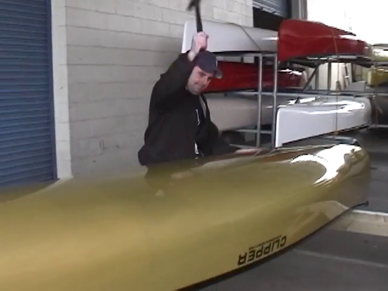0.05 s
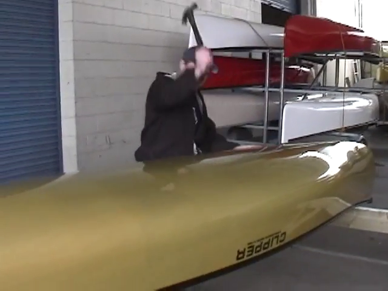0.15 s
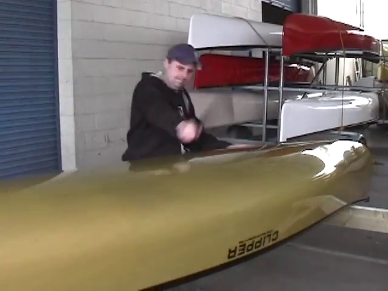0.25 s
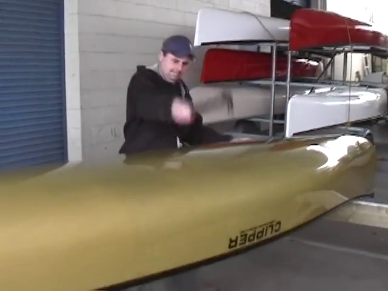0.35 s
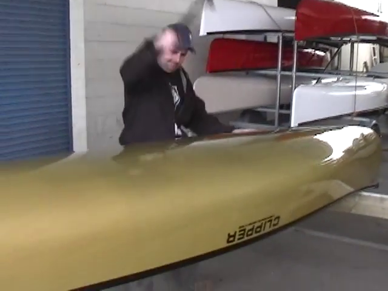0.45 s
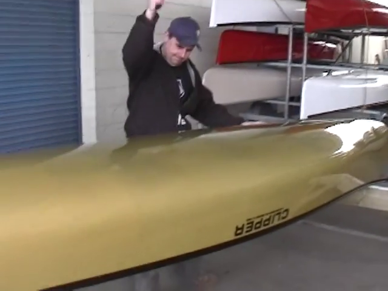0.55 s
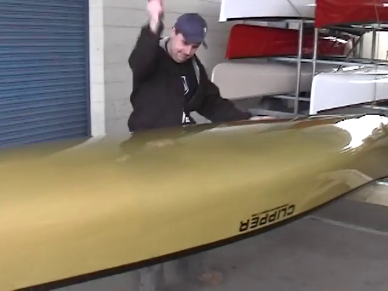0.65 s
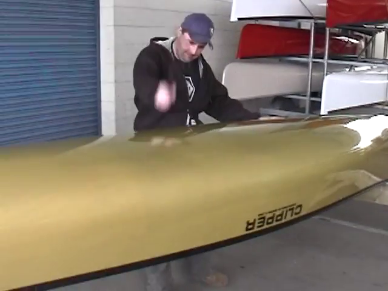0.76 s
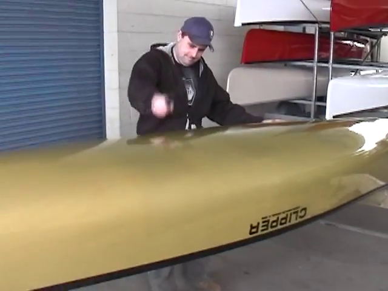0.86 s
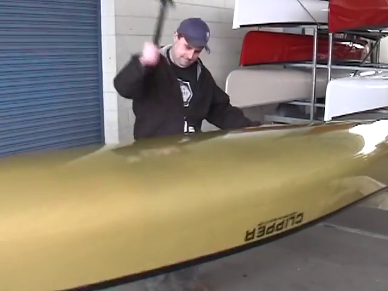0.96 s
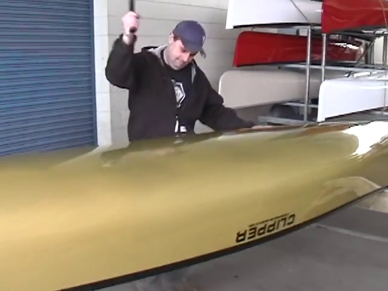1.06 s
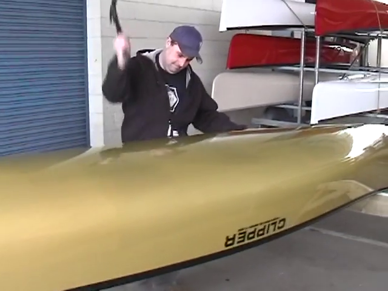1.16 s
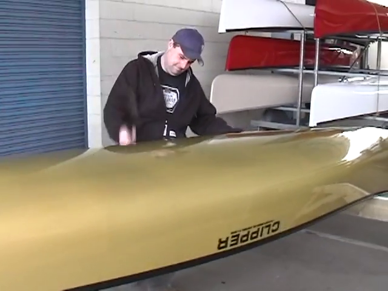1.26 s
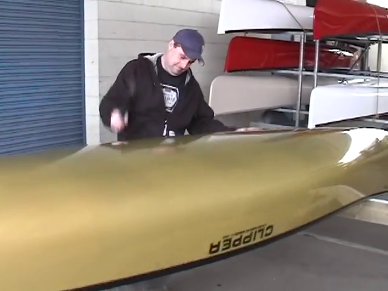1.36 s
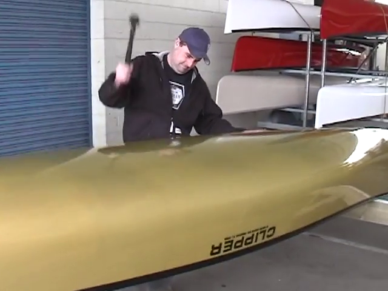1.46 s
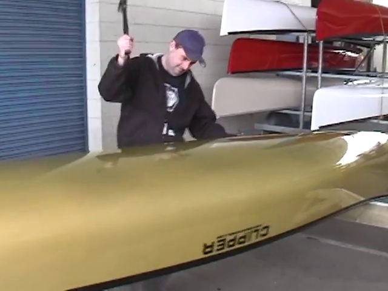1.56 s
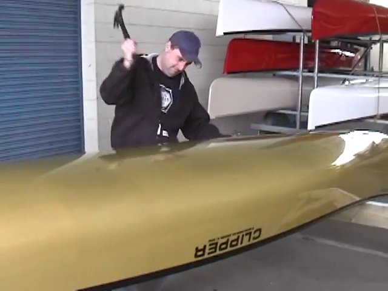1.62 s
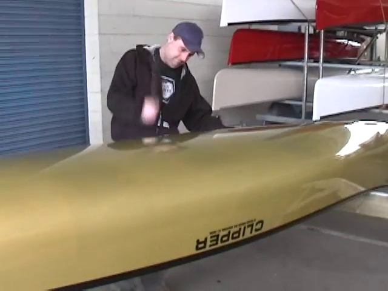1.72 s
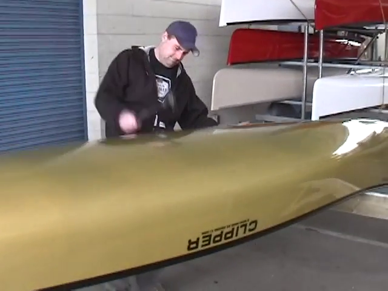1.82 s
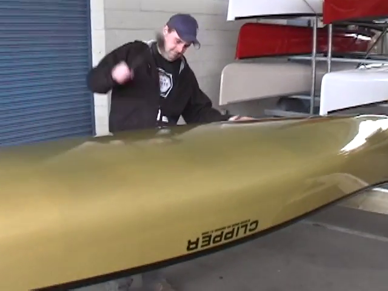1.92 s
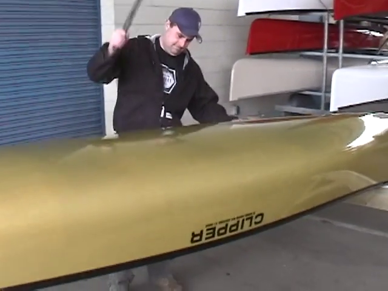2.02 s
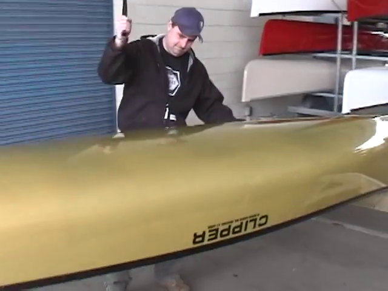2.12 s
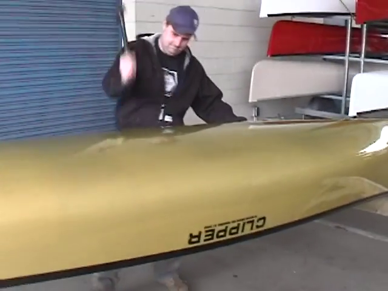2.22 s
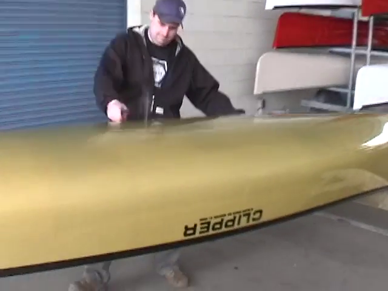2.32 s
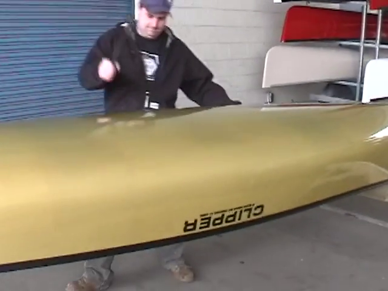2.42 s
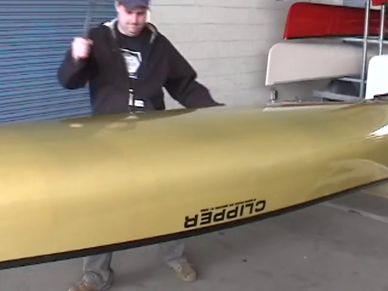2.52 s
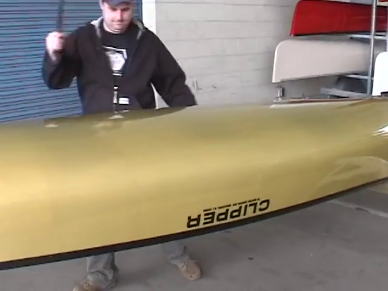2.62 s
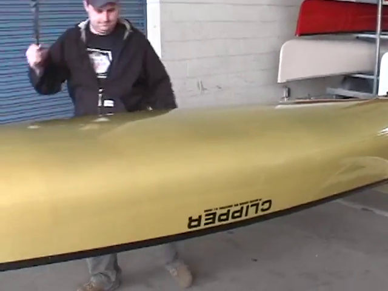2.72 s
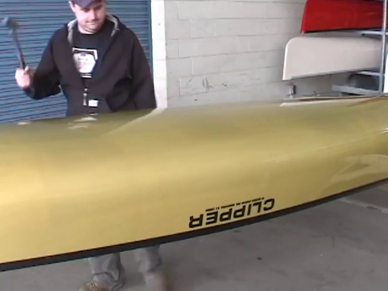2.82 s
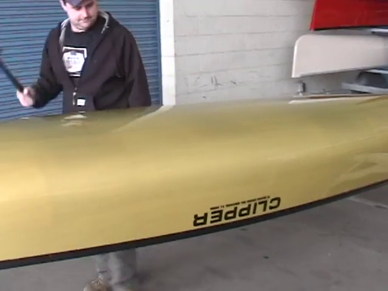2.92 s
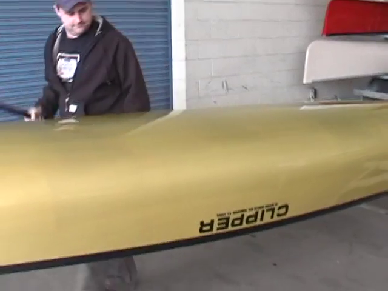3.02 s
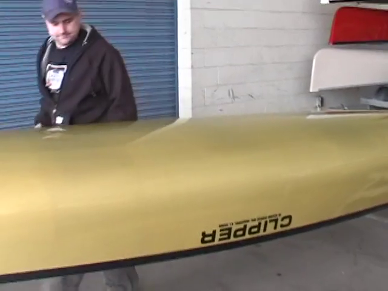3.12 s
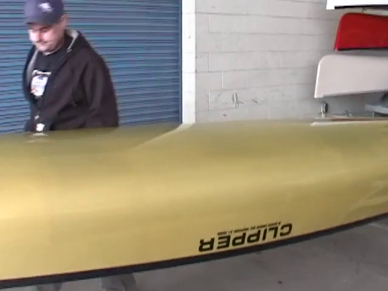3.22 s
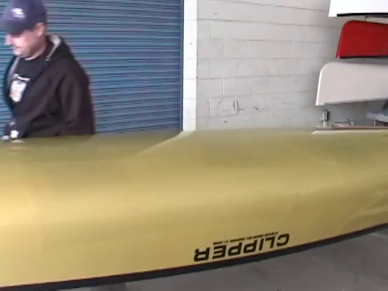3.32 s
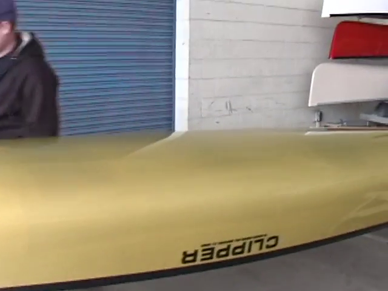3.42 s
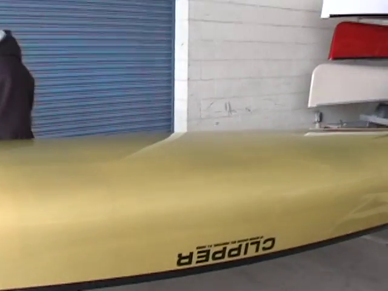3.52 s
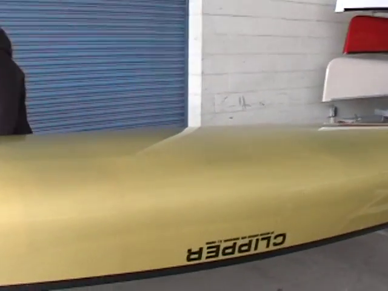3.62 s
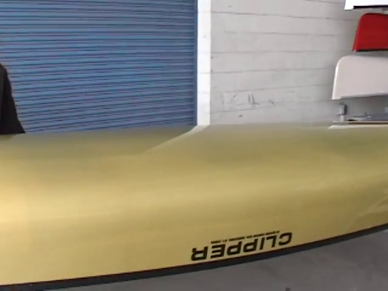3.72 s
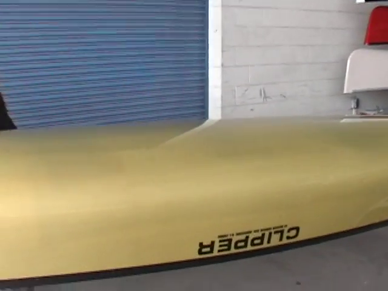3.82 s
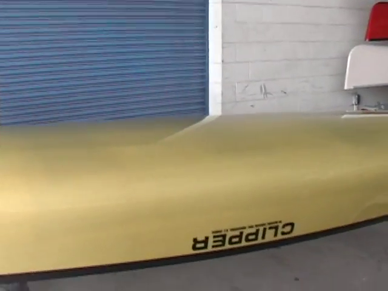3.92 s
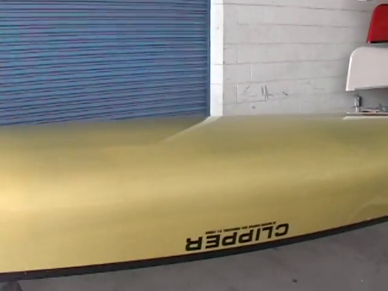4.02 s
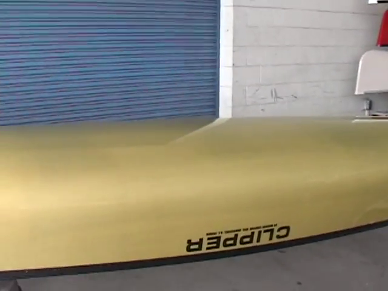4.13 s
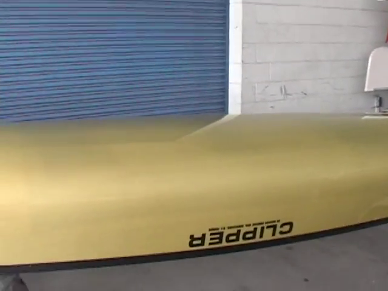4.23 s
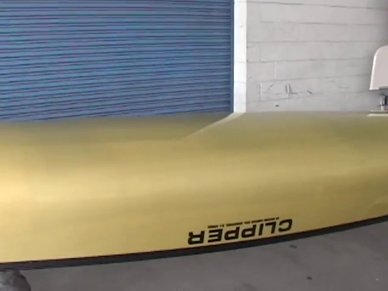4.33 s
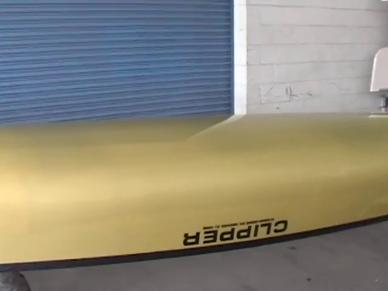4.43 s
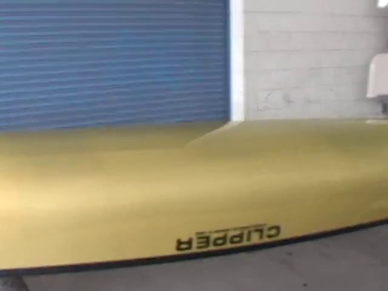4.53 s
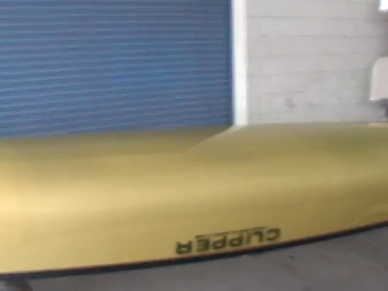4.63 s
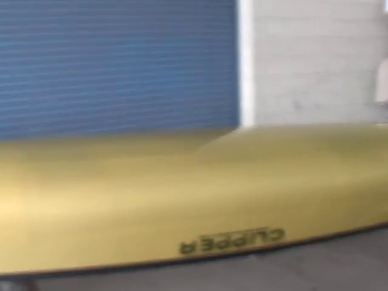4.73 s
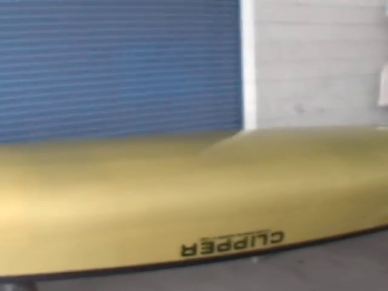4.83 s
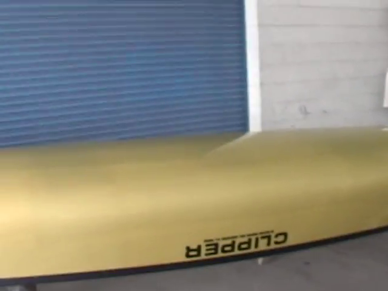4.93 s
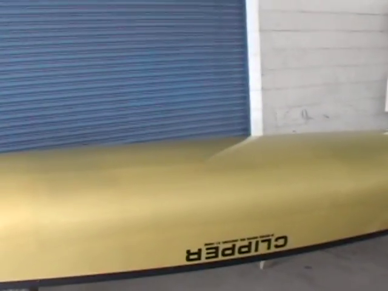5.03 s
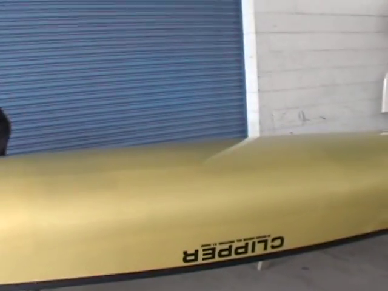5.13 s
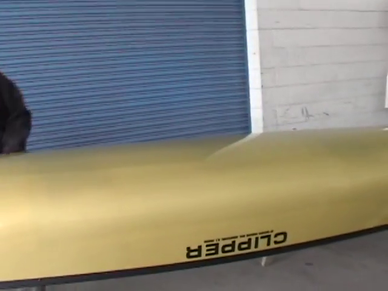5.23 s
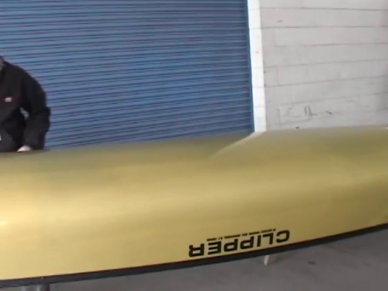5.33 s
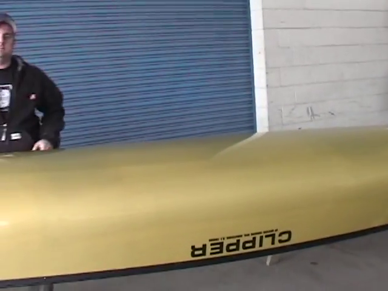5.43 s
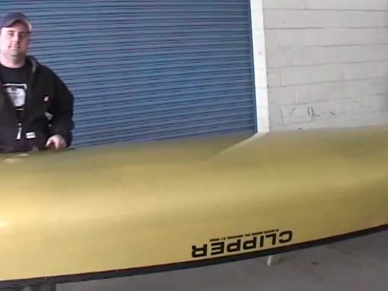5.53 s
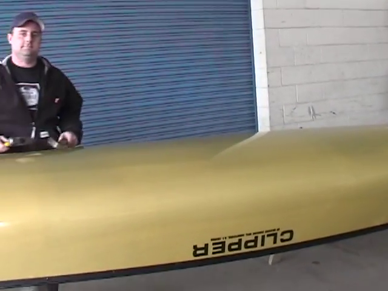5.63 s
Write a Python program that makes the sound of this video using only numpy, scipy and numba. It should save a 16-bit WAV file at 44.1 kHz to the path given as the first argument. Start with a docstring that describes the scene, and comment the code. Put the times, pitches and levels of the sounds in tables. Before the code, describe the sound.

In an echoing concrete boat shed, heavy hammer blows land evenly on a hard canoe hull, each a sharp crack with a hollow boom, a brief rattle and a softer rebound knock. The nearby microphone sounds squashed by the hits. After five blows the hammering stops and steady fan noise gradually rises, joined late by small handling clicks and a low machine drone.

```python
"""Hammering a canoe hull

A man hammers an upturned composite hull in a concrete boat shed, about two blows a second. Each blow
cracks, rings the shell, rattles fittings and fills the hall; the hull then jolts back on its stands.
The camcorder's gain control ducks for the blows, then slowly lifts the ventilation hum.
A few light clicks follow and a machine drone swells in."""
import sys
import numpy as np
from scipy import signal
from scipy.fft import rfft, irfft, next_fast_len
from scipy.io import wavfile
from scipy.ndimage import uniform_filter1d
from numba import njit

SR = 44100
rng = np.random.default_rng(int(sys.argv[2]) if len(sys.argv) > 2 else 0)


def unload_audio(sound):
    """Save the sound as a 16-bit wav file, at the path given as the first command line argument."""
    columns = np.transpose(np.atleast_2d(sound))
    # keep every value between -1 and 1, then stretch to whole-number steps
    steps = np.round(np.clip(columns, -1, 1) * 32767)
    wavfile.write(sys.argv[1], SR, steps.astype(np.int16))


N = 249593


# blows: t/s, level/dB, wait to jolt/s, jolt level/dB
BLOWS = [(-0.165, 6.5, 0.326, -13.5), (0.3304, 2.5, 0.23, -9), (0.8380, 4, 0.214, -5),
         (1.3203, 7, 0.25, -5.5), (1.8127, 6, 0.253, -0.5), (2.3485, 11, 0.28, -10)]
# dense shell resonances: f/Hz, density/dB
SHELL_SPECTRUM = [(30, -20), (60, -17.5), (100, -3), (200, -2), (380, 0.5), (600, -5.5), (1050, -8),
                  (2000, -14), (3600, -19.5), (5500, -16), (9000, -13), (12000, -15), (15500, -30.5)]
# snap of a hard contact on the skin: f/Hz, density/dB
SNAP_SPECTRUM = [(300, -17.5), (2500, -12), (4500, 0), (6500, 0), (9500, 2), (12000, -0.5), (16000, -17.5)]

def hammering(ripple_db=1.5, usual_blow_db=5, size=65536):
    """Each blow snaps on the skin and shakes the hull, which then jolts back on its stands."""
    out = np.zeros((2, N))
    hz = np.arange(30, 16000, 30)
    peaks_db = ripple_db * treble(hz) * rng.standard_normal(len(hz))  # stiff shell: narrow resonances
    shell = np.c_[hz, read(SHELL_SPECTRUM, hz) + peaks_db]
    for at_s, db, wait_s, jolt_db in BLOWS:
        extra_db = db - usual_blow_db  # the hull flexes only so far: extra force goes to the midrange
        crack = strike(shell, size, t60_s=0.51, hall_db=2.5,
                       bright_db=-0.5 * extra_db, boom_db=-1.16 * extra_db)
        ring = undb(-11) * hull_ring(size)
        snap = undb(-5.5) * burst(SNAP_SPECTRUM, t60_s=0.009, bright_db=5, size=4096)
        add(out, undb(db) * snap, at_s)
        add(out, undb(db) * (crack + ring + rattle(size)), at_s)
        knock = strike(shell, size, t60_s=0.23, hall_db=-12.5, bright_db=-1.5, boom_db=2.5)
        jolt = knock + undb(-15.5) * hull_ring(size)
        add(out, undb(jolt_db) * jolt, at_s + wait_s)
    return out


# sound straight from the hull: f/Hz, level/dB
DIRECT_SOUND = [(40, 4), (100, -3.5), (400, -15.5), (1200, -12), (3000, -6), (7000, -4), (15000, -8.5)]
# shed reverberation: f/Hz, t60/s
HALL_DECAY = [(40, 0.8), (100, 1.06), (400, 1.275), (1100, 1.43), (2900, 1.157), (5500, 0.72), (9000, 0.66),
              (15000, 0.48)]

def strike(colour, size, t60_s, hall_db, bright_db, boom_db):
    """Dense shell resonances ring out; the hall fills as they empty, then dies away, treble first."""
    hz, spectrum = noise_spectrum(colour, size)
    t, out = np.arange(size) / SR, 0
    centres_hz = np.geomspace(30, 16000, 15)
    for band_hz, weights in zip(centres_hz, np.eye(len(centres_hz))):
        band = irfft(spectrum * read(np.c_[centres_hz, weights], hz), size)
        ring = fade(t, t60_s) ** 2
        hall = (1 - ring) * fade(t, read(HALL_DECAY, band_hz)) ** 2
        power = undb(read(DIRECT_SOUND, band_hz)) ** 2 * ring + undb(hall_db) ** 2 * hall
        tilt_db = bright_db * treble(band_hz) + boom_db / (1 + (band_hz / 350) ** 2)
        out += band * np.sqrt(power) * undb(tilt_db)
    return out


# modes of the hull and the air under it: f/Hz, level/dB, t60/s
HULL_MODES = [(81.7, -8.5, 1.75), (112.7, -6.5, 1.67), (128, -4, 1.22), (162, -0.5, 1.28),
              (178.8, 1.5, 1.17), (190.1, -2, 0.85), (221, -5.5, 0.84), (273.3, 1.5, 0.79),
              (318.4, -2.5, 1.5), (351.6, -4.5, 1.5), (379.7, 1, 1.23), (421.5, 0.5, 1.06),
              (468, -10, 0.52), (504, -3, 1.39), (673, -7.5, 1.34), (806, -1.5, 0.78), (976, -7, 0.88),
              (1145, -3.5, 0.79)]

def hull_ring(size, swell_s=0.049, scatter_db=2, detune=0.00788):
    """Low modes; each blow lands on a new spot and weights them anew."""
    t, out = np.arange(size) / SR, 0
    for hz, db, t60_s in HULL_MODES:
        weight, pitch, phase = rng.standard_normal(3)
        wave = np.sin(2 * np.pi * (hz * (1 + detune * pitch) * t + phase))
        out += undb(db + scatter_db * weight) * fade(t, t60_s) * wave
    return out * (1 - np.exp(-t / swell_s))


def rattle(size, count=14, settle_t60_s=0.58):
    """Loose fittings tick at random while the shaken hull settles."""
    out = np.zeros((2, size))
    for when, force in rng.random((count, 2)):
        at_s = 0.08 + 0.3 * when
        tick = burst(SNAP_SPECTRUM, t60_s=0.02, bright_db=3, size=2048)
        add(out, undb(0.75 + 7 * force) * fade(at_s, settle_t60_s) * tick, at_s)
    return out


# handling clicks: t/s, level/dB, treble/dB
CLICKS = [(4.6608, -37, 11.5), (4.7642, -24, -2)]
# rebound spacing per click: gap/s
REBOUND_GAPS_S = [0.018, 0.0502]

def handling(rebounds=2):
    """Something handled clicks, then rebounds at even gaps, softer and duller."""
    out = np.zeros((2, N))
    for (at_s, db, bright_db), gap_s in zip(CLICKS, REBOUND_GAPS_S):
        add(out, undb(db) * click(bright_db), at_s)
        for k in range(1, rebounds + 1):
            add(out, undb(db - 4) * click(bright_db - 3), at_s + k * gap_s)
    return out


# click colour: f/Hz, density/dB
CLICK_SPECTRUM = [(300, -21.5), (2000, 3), (4000, -5.5), (6000, -9), (8000, -7.5), (11000, -11.5),
                  (12500, -28), (15000, -42)]

def click(bright_db):
    """A small hard contact with a faint wash of the hall."""
    tick = burst(CLICK_SPECTRUM, t60_s=0.015, bright_db=bright_db, size=16384)
    wash = burst(CLICK_SPECTRUM, t60_s=0.45, bright_db=bright_db, size=16384)
    return tick + undb(-19) * wash


# drone harmonics 1, 3, 5: level/dB
DRONE_LEVELS_DB = [-38, -38.5, -39.5]

def drone(pitch_hz=85, mid_swell_s=4.96, rise_s=0.3):
    """A machine's hollow drone of odd harmonics swells in and stays."""
    t = np.arange(N) / SR
    swell = (1 + np.tanh(2 * (t - mid_swell_s) / rise_s)) / 2
    harmonics = [((2 * k + 1) * pitch_hz, db) for k, db in enumerate(DRONE_LEVELS_DB)]
    return swell * tones(harmonics, waver_db=2, drift_hz=0.703)


# rushing air: f/Hz, density/dB
AIR_SPECTRUM = [(25, -24), (50, -6), (90, -1), (200, -3), (420, -2.5), (700, -2), (1150, -2.5),
                (2000, -11.5), (3000, -19.5), (4000, -26), (7000, -34), (11000, -42.5), (14000, -51.5),
                (16000, -49.5)]
# fan harmonics: multiple of shaft rate
FAN_ORDERS = [3, 5, 7, 8, 9, 10, 11, 14, 15, 16, 17, 19]
# fan harmonics: level/dB
FAN_LEVELS_DB = [-46, -46, -50, -48.5, -48, -46, -48, -51, -49, -46, -46.5, -51.5]
# other motors and mains: f/Hz, level/dB
MOTOR_HUM = [(58, -49), (71, -48.5), (88.6, -40), (120, -44), (803, -53)]

def ventilation(shaft_hz=25.5):
    """Air rushes over the harmonics of a fan and the hum of other motors."""
    size = next_fast_len(N)
    _, spectrum = noise_spectrum(AIR_SPECTRUM, size)
    air = irfft(spectrum, size)[:, :N]
    fan = tones(zip(shaft_hz * np.array(FAN_ORDERS), FAN_LEVELS_DB), waver_db=3, drift_hz=0.9)
    motors = tones(MOTOR_HUM, waver_db=3, drift_hz=0.696)
    return undb(-32 + 0.25 * walk(rate_hz=4.9)) * air + fan + motors


# stereo width: f/Hz, side minus mid/dB
STEREO_WIDTH = [(30, -5), (60, -13), (110, -18), (200, -20.5), (380, -14.5), (700, -10.5), (1300, -6.5),
                (2400, -3), (4400, -2.5), (8100, -6), (15000, -12.5)]

def noise_spectrum(colour, size):
    """Frequencies and stereo spectrum of coloured noise, mid at rms 1."""
    hz = np.fft.rfftfreq(size, 1 / SR)
    mid, side = rfft(rng.standard_normal((2, size)))
    side *= undb(read(STEREO_WIDTH, hz))
    gain = undb(read(colour, hz))
    return hz, np.array([mid + side, mid - side]) * gain / np.sqrt(np.mean(gain ** 2))


def burst(colour, t60_s, bright_db, size, attack_s=0.00036):
    """Decaying noise of a hard contact."""
    hz, spectrum = noise_spectrum(colour, size)
    t = np.arange(size) / SR
    noise = irfft(spectrum * undb(bright_db * treble(hz)), size)
    return noise * fade(t, t60_s) * (1 - np.exp(-t / attack_s))


def tones(table, waver_db, drift_hz, drift_rate_hz=3):
    """Sustained sines that waver in level and pitch."""
    out = 0
    for hz, db in table:
        turns = np.cumsum(hz + drift_hz * walk(drift_rate_hz)) / SR + rng.random()
        rms = undb(db + waver_db * walk(rate_hz=2.39))
        out += np.sqrt(2) * rms * np.sin(2 * np.pi * turns)
    return out


def walk(rate_hz):
    """Smooth random wander, spread near 1."""
    hold = int(SR / rate_hz)
    steps = np.repeat(rng.standard_normal(N // hold + 1), hold)
    return 1.3 * uniform_filter1d(uniform_filter1d(steps, hold), hold)[:N]


def undb(db):
    """Decibels to gain."""
    return 10 ** (np.asarray(db) / 20)


def read(table, hz):
    """Table lookup on a log-frequency axis."""
    knots_hz, values = np.transpose(table)
    return np.interp(np.log(np.maximum(hz, 1)), np.log(knots_hz), values)


def fade(t, t60_s):
    """Amplitude falling 60 dB in t60_s."""
    return np.exp(-np.log(1000) * t / t60_s)


def treble(hz):
    """Shelf from 0 in the bass to 1 in the treble."""
    return hz ** 2 / (hz ** 2 + 3000 ** 2)


def add(out, sound, at_s):
    """Mix a sound in; at_s may be negative."""
    start = int(round(at_s * SR))
    a, b = np.clip([start, start + sound.shape[1]], 0, N)
    out[:, a:b] += sound[:, a - start:b - start]


def scene():
    """Everything that sounds in the shed."""
    return hammering() + handling() + ventilation() + drone()


def drum_notches(x, drum_hz=149.85, depth=0.97, narrowness=0.49):
    """The camcorder's comb filter notches every harmonic of its tape drum."""
    size = next_fast_len(N + SR)
    delay = np.exp(-2j * np.pi * np.fft.rfftfreq(size, 1 / SR) / drum_hz)
    comb = (1 - depth * delay) / (1 - narrowness * delay)
    return irfft(rfft(x, size) * comb, size)[:, :N]


@njit
def follow_peak(x, level, charge, leak):
    """Peak detector: charges quickly, leaks slowly."""
    out = np.empty(len(x))
    for i in range(len(x)):
        level = level + (x[i] - level) * charge if x[i] > level else level * leak
        out[i] = level
    return out


def gain_control(x, ceiling_db=-6, start_peak_db=14, attack_s=0.0006, release_db_per_s=10):
    """Starts turned down by earlier blows, clamps peaks at once and creeps back up."""
    charge = 1 / (1 + attack_s * SR)
    leak = float(undb(-release_db_per_s / SR))
    peak = follow_peak(np.abs(x).max(axis=0), float(undb(start_peak_db)), charge, leak)
    return x / np.sqrt(1 + (peak / undb(ceiling_db)) ** 2)


# camcorder whine: f/Hz, level/dB
CAMCORDER_WHINE = [(8500, -70), (15735, -82)]

def record(dry, saturation=0.57, cutoff_hz=16000):
    """Drum comb and thin whine, then gain control, rounded peaks and a low-pass."""
    whine = tones(CAMCORDER_WHINE, waver_db=1.5, drift_hz=50, drift_rate_hz=120)
    levelled = gain_control(drum_notches(dry) + whine)
    rounded = levelled / (1 + (levelled / saturation) ** 4) ** 0.25
    lowpass = signal.ellip(8, 0.2, 70, cutoff_hz, fs=SR, output="sos")
    return signal.sosfilt(lowpass, rounded)


dry = scene()
out = record(dry)
unload_audio(out)
```